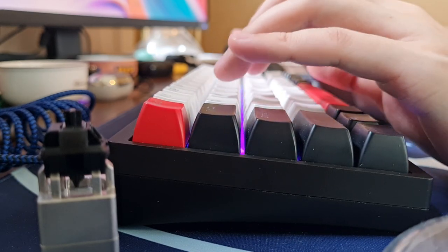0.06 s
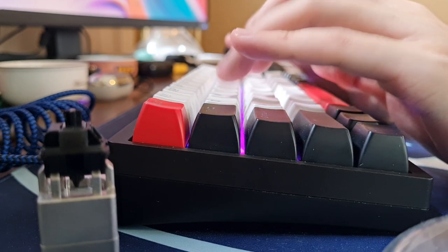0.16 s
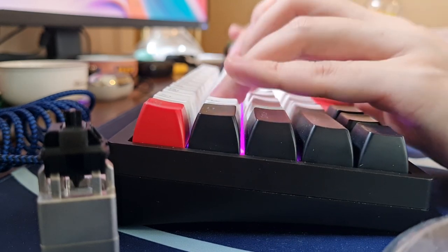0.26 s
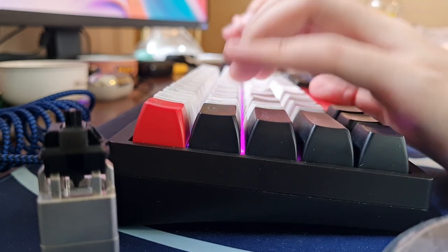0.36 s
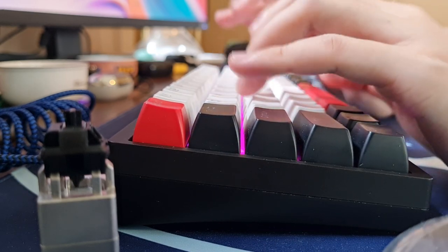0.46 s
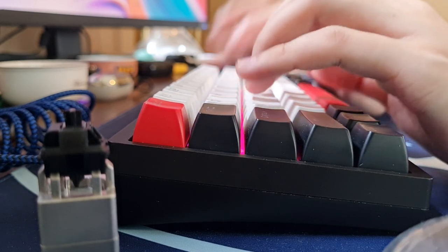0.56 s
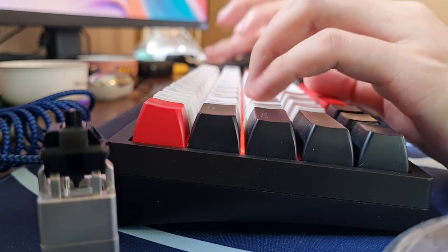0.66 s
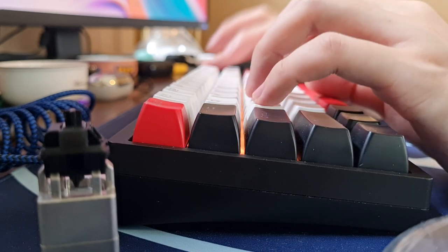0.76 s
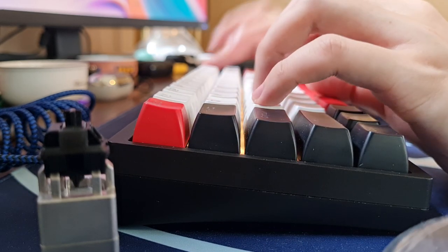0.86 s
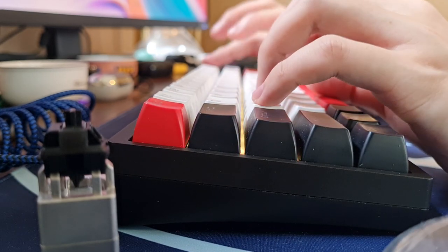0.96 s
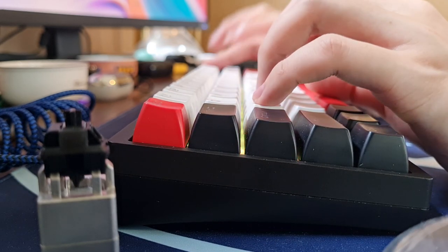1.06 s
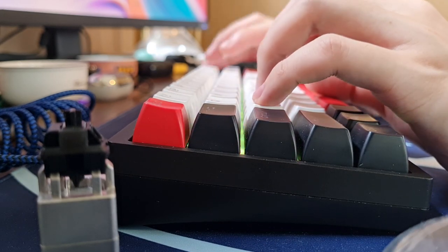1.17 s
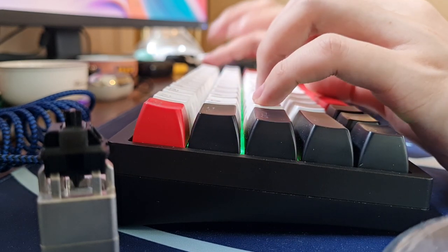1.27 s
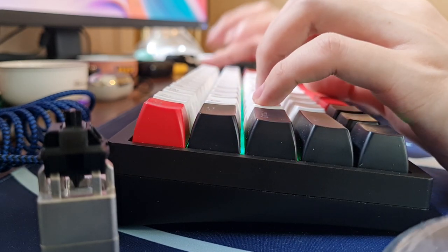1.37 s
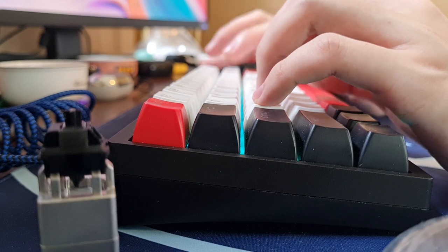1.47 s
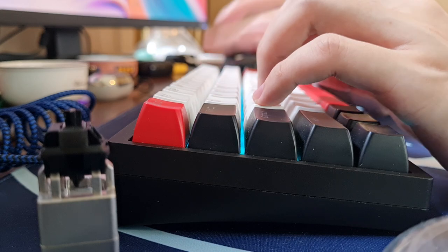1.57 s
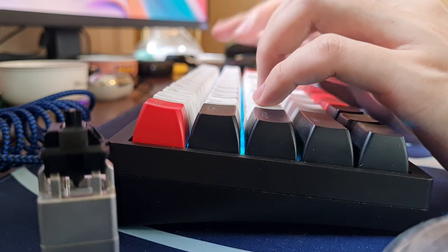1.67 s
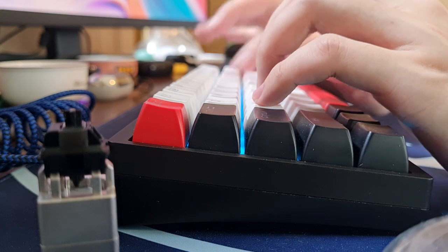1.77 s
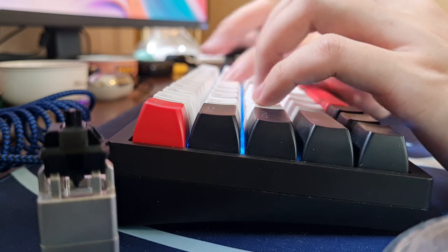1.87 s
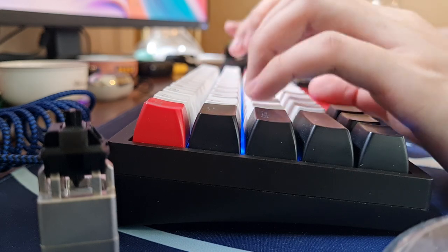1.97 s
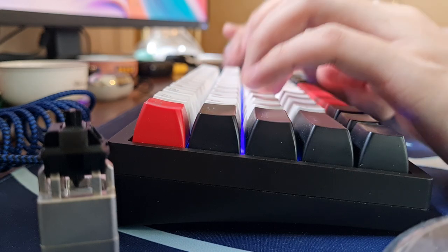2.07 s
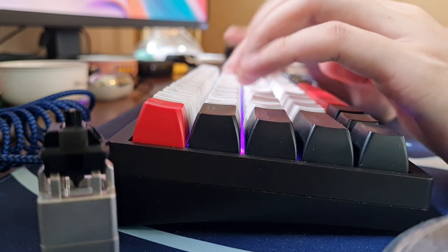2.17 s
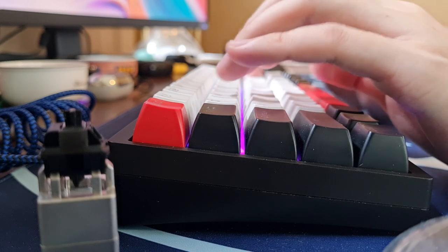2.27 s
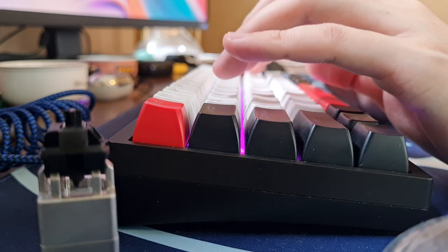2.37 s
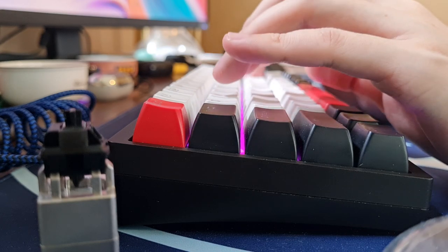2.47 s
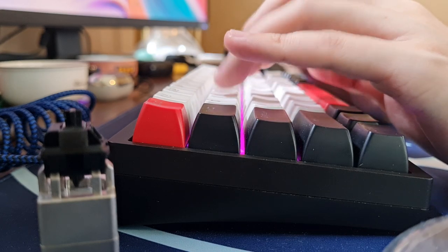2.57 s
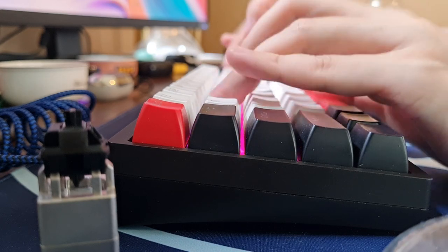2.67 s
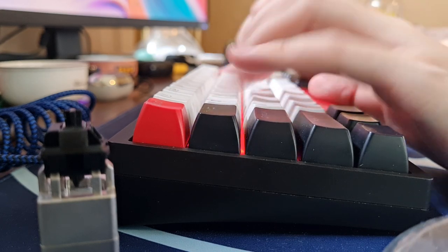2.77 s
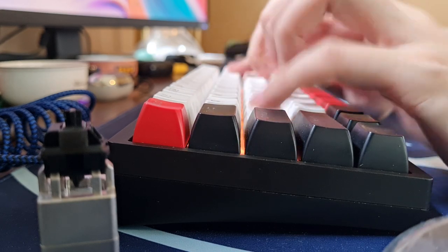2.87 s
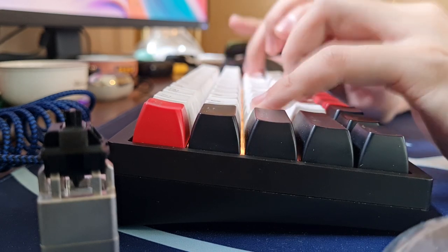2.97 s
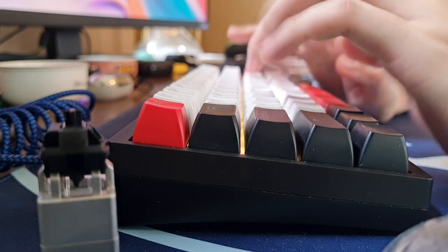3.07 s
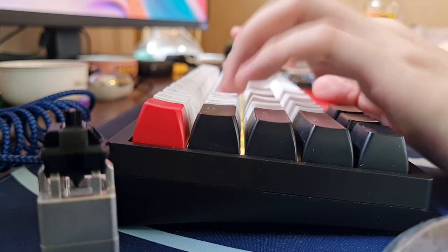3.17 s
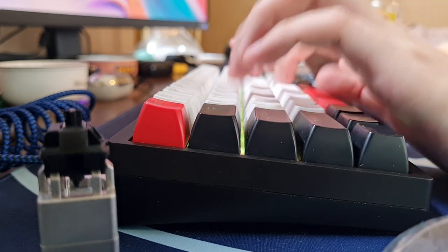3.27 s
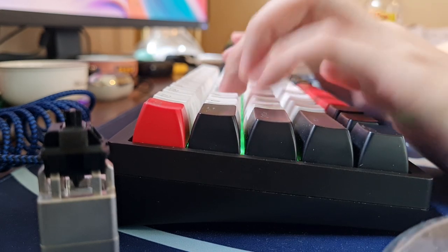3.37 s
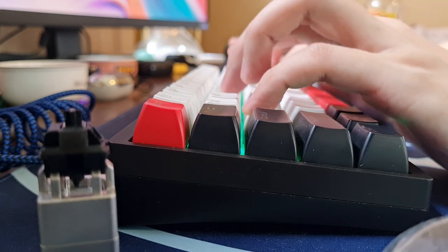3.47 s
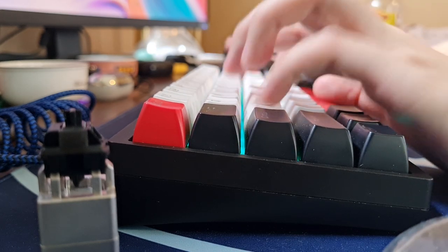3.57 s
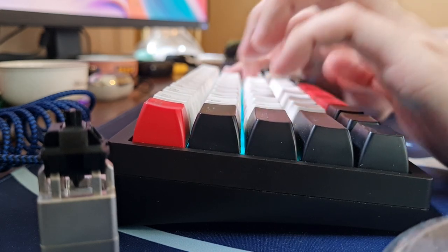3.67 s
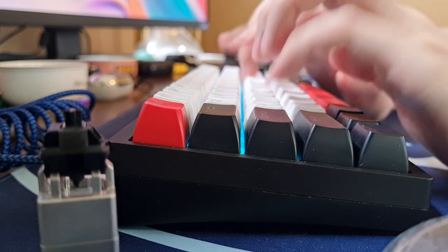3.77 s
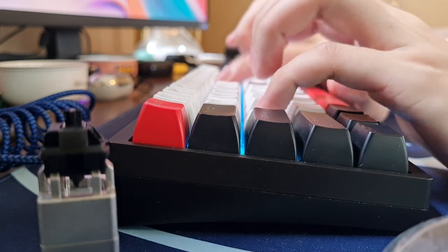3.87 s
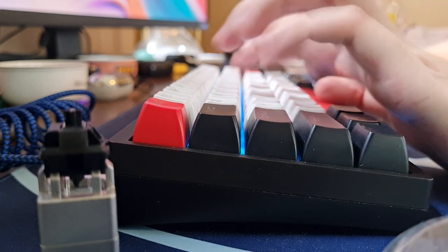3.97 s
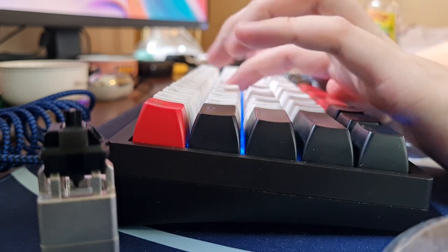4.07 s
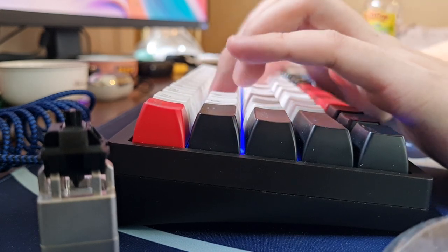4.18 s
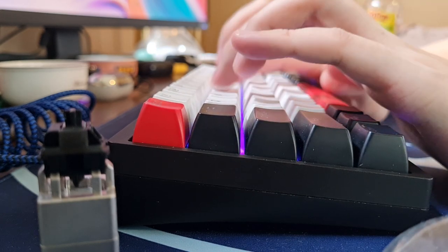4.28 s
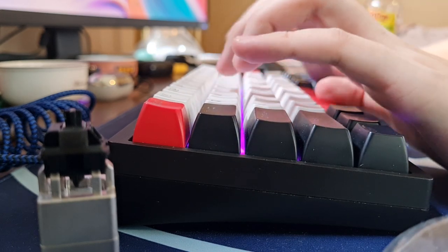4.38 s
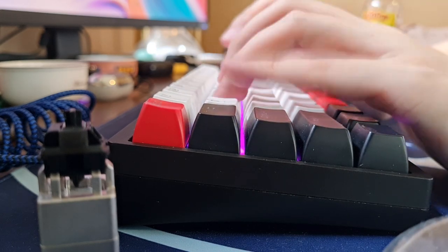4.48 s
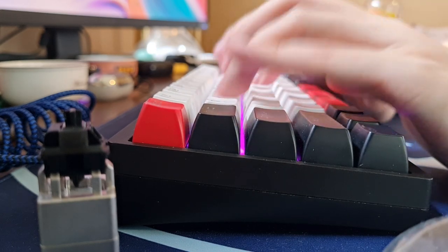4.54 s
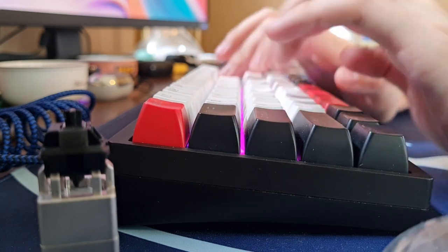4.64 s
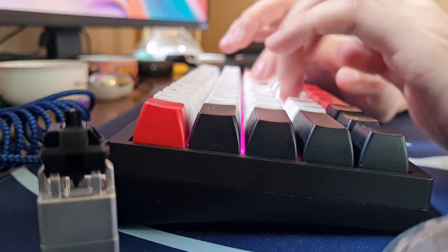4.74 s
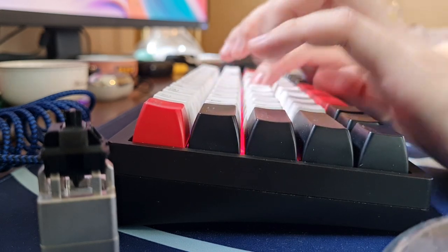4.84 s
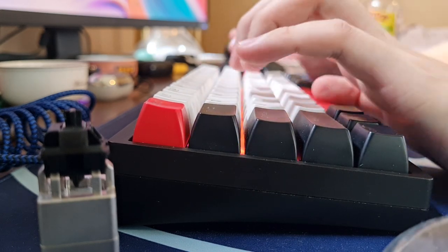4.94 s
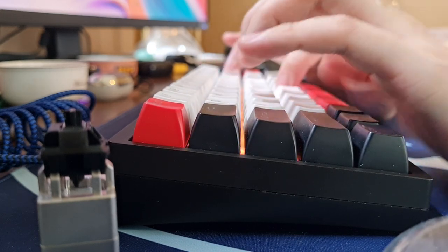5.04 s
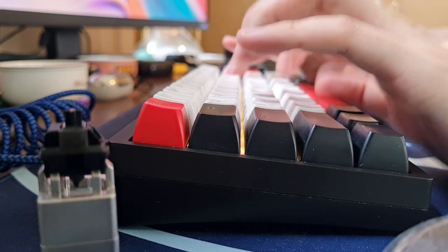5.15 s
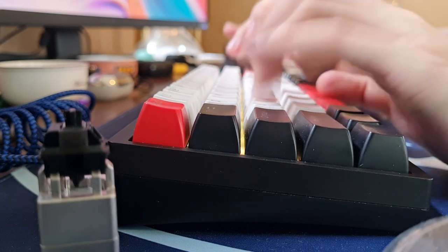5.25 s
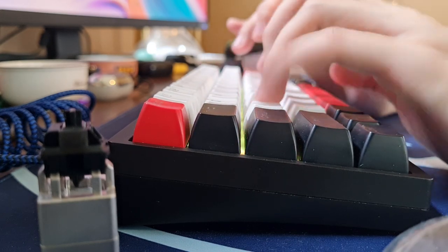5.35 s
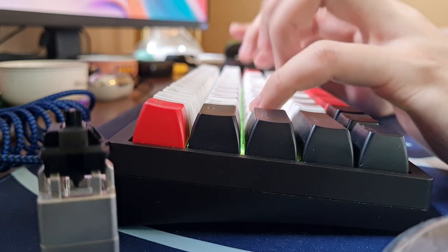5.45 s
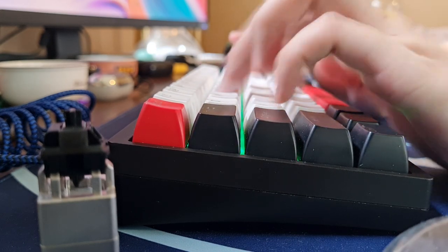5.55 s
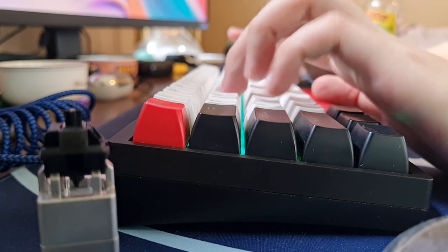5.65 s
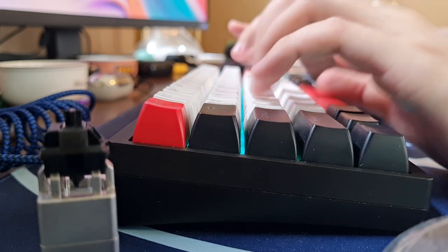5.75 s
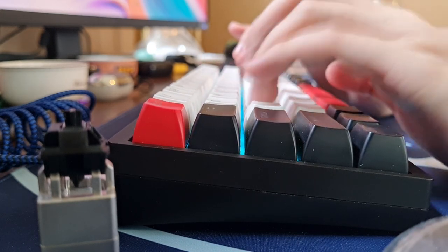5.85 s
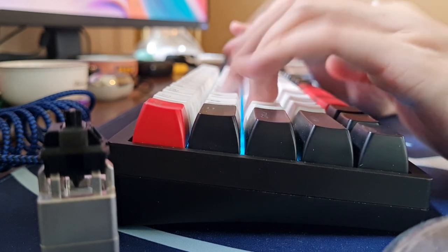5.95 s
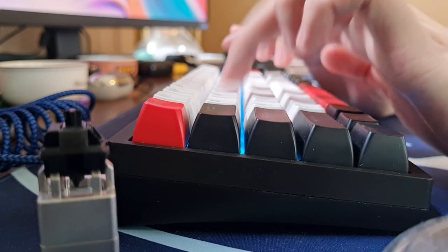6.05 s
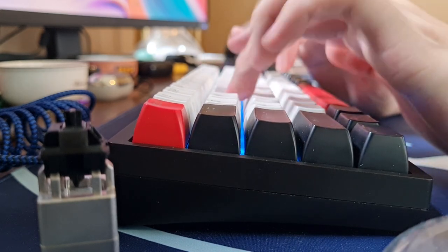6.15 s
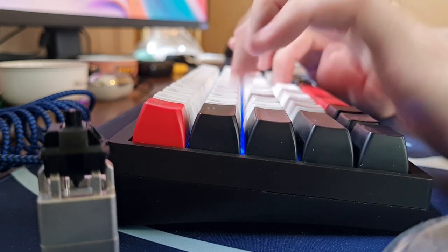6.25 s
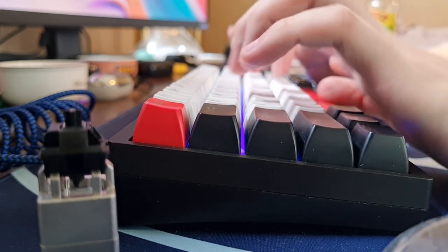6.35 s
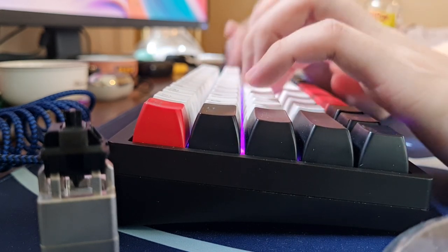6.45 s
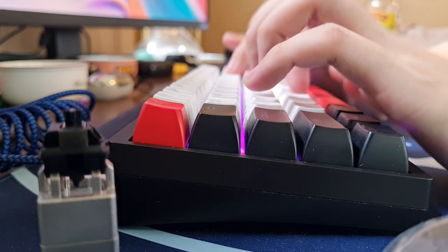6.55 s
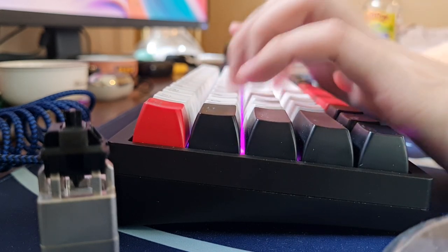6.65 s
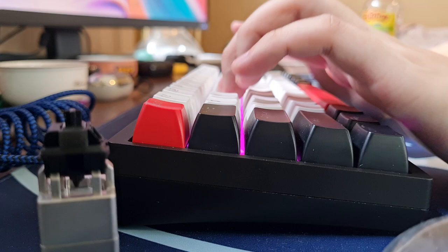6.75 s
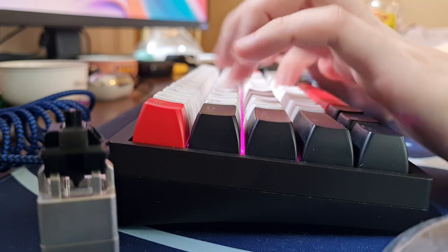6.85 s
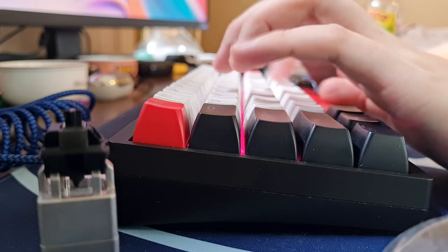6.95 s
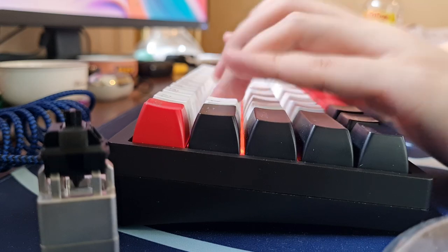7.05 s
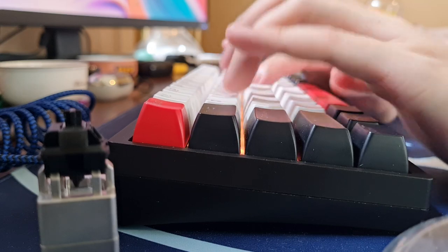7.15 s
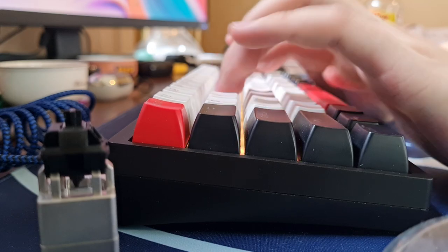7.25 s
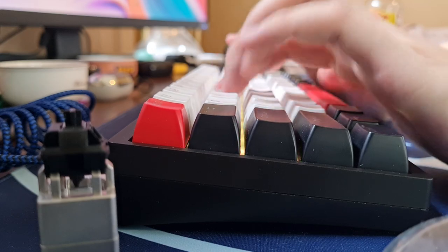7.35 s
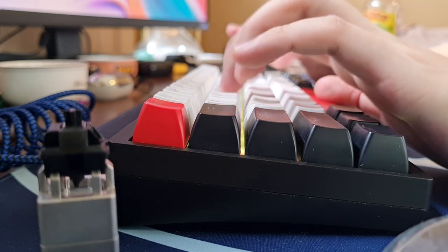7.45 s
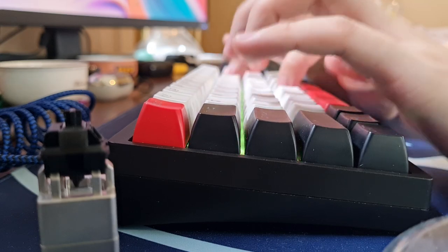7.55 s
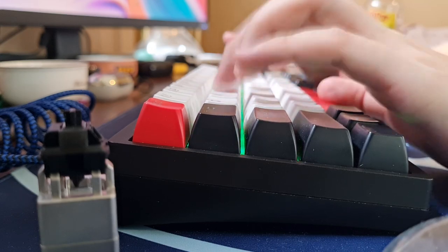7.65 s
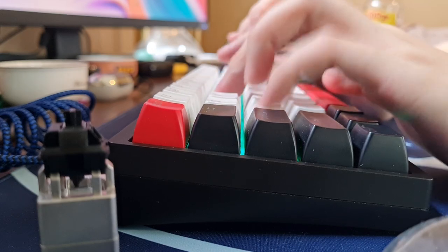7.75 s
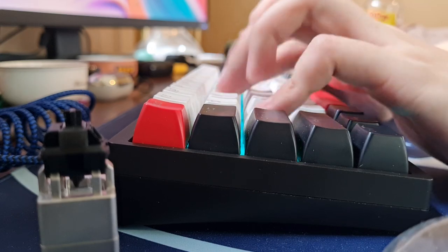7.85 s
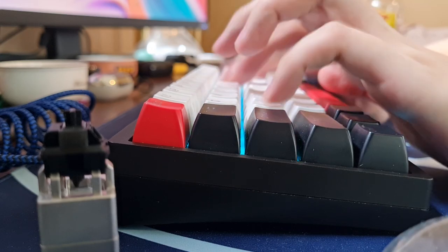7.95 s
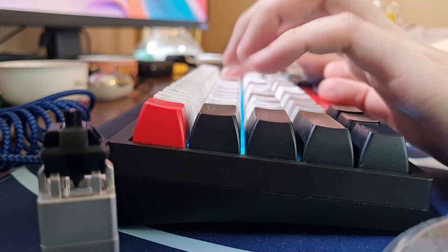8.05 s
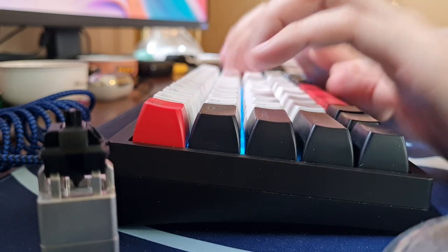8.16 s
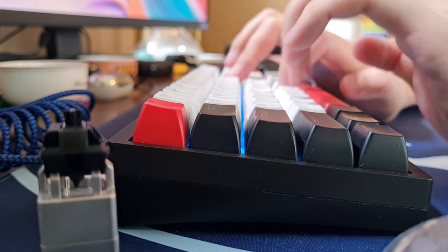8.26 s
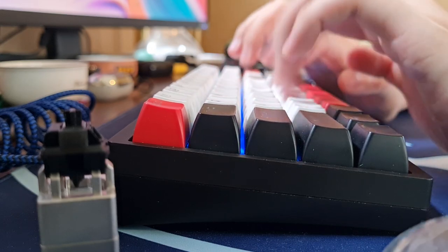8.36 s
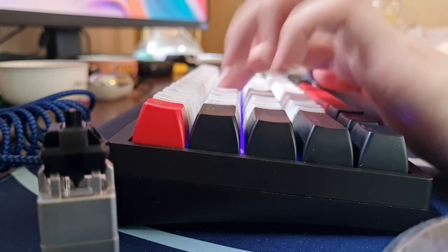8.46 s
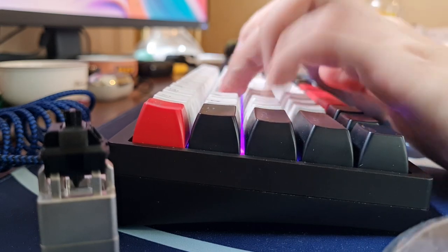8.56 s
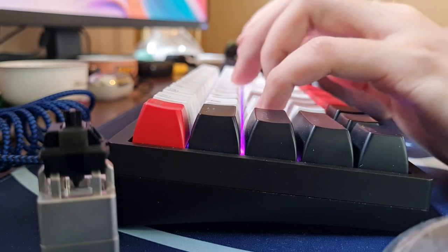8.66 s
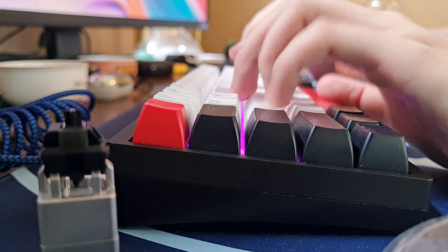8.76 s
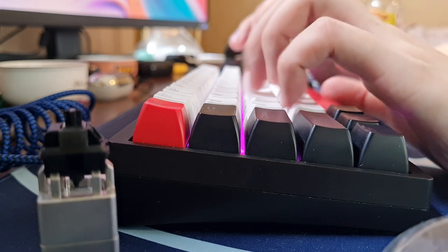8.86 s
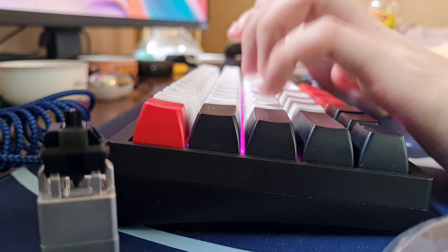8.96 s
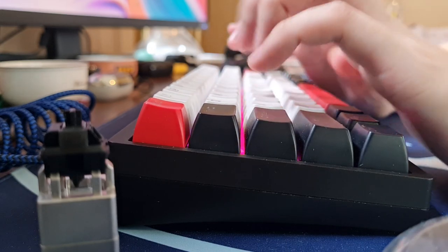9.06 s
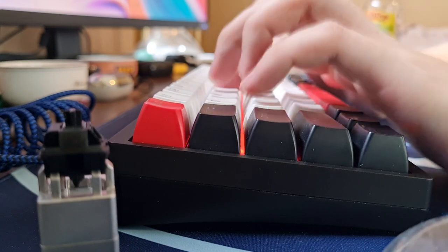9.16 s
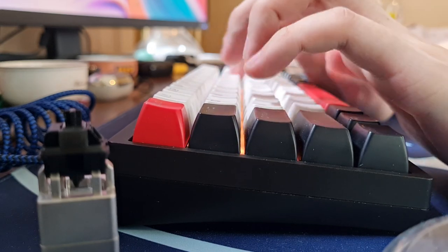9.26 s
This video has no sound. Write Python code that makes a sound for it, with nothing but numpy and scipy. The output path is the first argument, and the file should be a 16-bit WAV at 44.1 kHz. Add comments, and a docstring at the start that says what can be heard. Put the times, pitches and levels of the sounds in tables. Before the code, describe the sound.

Close, rapid keyboard clatter: muted, woody key clacks, faint clicks and low desk thumps, briefly giving way to steady tapping on one far key.

```python
"""A small quiet room, two microphones just beside the edge of a foam-damped mechanical keyboard, 9.3 s.
A faint hum of air runs throughout; at once letters are typed fast, each a scuff, then ringing cap, plate and case
with a thin click and a later faint tick, and the deeper thock of the space bar falls among them.
From 0.66 to 1.62 s one far key is tapped in a dull run; from 1.73 s the fast typing resumes to the end.
Low desk modes boom under the blows, noise rumbles as the hands lean, and a decaying room tail follows each stroke."""
import sys
import numpy as np
from scipy import signal
from scipy.fft import rfft, irfft, next_fast_len
from scipy.io import wavfile

SR = 44100
rng = np.random.default_rng(int(sys.argv[2]) if len(sys.argv) > 2 else 0)


def dump_mix(stems):
    """Bounce the given channels to the path in sys.argv[1] as a 16-bit WAV at rate SR."""
    frames = np.atleast_2d(stems).T  # one column per channel
    limited = np.clip(frames, -1, 1)  # hard clip at full scale
    pcm = np.round(limited * 32767).astype(np.int16)
    wavfile.write(sys.argv[1], SR, pcm)


N = 411012
T = np.arange(2048) / SR  # time axis of one short sound, s
BLOW_S = .007  # length over which a blow's level is reckoned
LEVEL_SCATTER_DB, PITCH_SCATTER = 2.5, .03  # usual mode-to-mode spread: dB, natural log of pitch
STROKE_SCATTER_DB = .5
MIC_SKEW_RAD = .2  # usual random phase of a mode at each microphone from 1200 Hz up
ORDINARY_KEY_DB, ORDINARY_BAR_DB, ORDINARY_FAR_DB = -35.5, -32, -38.5  # strength of an ordinary stroke
DEPTH_EDGE = -0.83  # a key that springs back has a harder edge: dB per dB of depth


def amp(db):
    """Decibels to gain."""
    return 10 ** (np.asarray(db) / 20)


def along(points, hz):
    """(Hz, value) points read on a log frequency axis."""
    point_hz, value = np.transpose(points)
    return np.interp(np.log(hz + 1), np.log(point_hz), value)


def filtered(x, response):
    """Multiply the spectrum of x by a response of frequency."""
    size = x.shape[-1]
    padded = next_fast_len(size + 512)
    spectrum = rfft(x, padded) * response(np.fft.rfftfreq(padded, 1 / SR))
    return irfft(spectrum, padded)[..., :size]


def noise(spectrum, size):
    """Two unrelated coloured noises of rms 1."""
    x = filtered(rng.standard_normal((2, size)), lambda hz: amp(along(spectrum, hz)))
    return x / x.std()


def add(track, s, x):
    """Mix x into the track at time s, cut off at the track's end."""
    part = track[:, max(round(s * SR), 0):][:, :x.shape[-1]]
    part += x[..., :part.shape[-1]]


def blow(x, db):
    """Give a short sound the energy of db rms held for the length of a blow."""
    energy = np.mean(np.sum(x ** 2, -1))
    return amp(db) * x / np.sqrt(energy / (BLOW_S * SR))


def part_db(law, force_db):
    """Level of one part of a key for a stroke force_db stronger than ordinary."""
    ordinary_db, growth = law
    return ordinary_db + growth * force_db + STROKE_SCATTER_DB * rng.standard_normal()


def balance(pan_db):
    """Gains of the left and right microphones, pan_db apart; above 0 the left is louder."""
    return amp([[pan_db / 2], [-pan_db / 2]])


# faint air hum in the room, spectrum: freq_hz [Hz], level_db [dB per Hz, relative]
HUM_SPECTRUM = [(20, -26), (55, -1), (90, -7), (140, 2), (280, 0), (450, -12), (1000, -22), (1500, -29),
                (2600, -45), (5000, -49), (8000, -45), (16000, -48)]


def room_tone(side_db=-9):
    """A faint low hum of air, shaped noise nearly alike at both microphones."""
    mid, side = amp(-57.0) * noise(HUM_SPECTRUM, N)
    side = amp(side_db) * side
    return np.array([mid + side, mid - side])


# contact noise spectra of the thin click and the hard edge: freq_hz [Hz], level_db [dB per Hz, relative]
CLICK_SPECTRUM = [(2500, -51), (4000, 10.5), (5000, 0), (6000, 1), (7200, 0), (8600, 4.5), (9600, 12),
                  (10800, 2.5), (13000, -4), (16000, -24.5)]
EDGE_SPECTRUM = [(700, -20), (1300, 14), (2300, 1.5), (3100, 2), (4100, -8.5), (5200, -27), (9000, -34.5)]


def touch(db):
    """A fingertip brushes the loose cap just before the key lands: noise in 32 grains of random level."""
    grains = amp(3.5 * np.repeat(rng.standard_normal(32), len(T) // 32))
    scuff = noise(EDGE_SPECTRUM, len(T)) + amp(-19.5) * noise(CLICK_SPECTRUM, len(T))
    envelope = amp(-60 * T / 0.029) * (1 - np.exp(-T / 0.0013))
    return blow(scuff * grains * envelope, db)


def ring(modes, lag, scatter_db=LEVEL_SCATTER_DB, detune=PITCH_SCATTER, skew=MIC_SKEW_RAD):
    """Damped modes that swell, then decay; the right microphone hears them lag s later and skewed in phase."""
    hz, db, t60 = np.transpose(modes)[..., None]
    hz = hz * np.exp(detune * rng.standard_normal(hz.shape))
    t = np.maximum(T - np.array([0, lag])[:, None, None], 0)
    age = np.log(1000) * t / t60
    size = amp(db + scatter_db * rng.standard_normal(hz.shape))
    # the skew shrinks toward the bass
    phase = skew * np.minimum(hz / 1200, 1) * rng.standard_normal((2, *hz.shape))
    waves = np.sin(2 * np.pi * hz * t + phase)
    return np.sum(size * age * np.exp(-age) * waves, 1)


def crack(spectrum, db, t60):
    """A burst of contact noise with a sharp rise and an exponential decay."""
    envelope = amp(-60 * T / t60) * (1 - np.exp(-T / 0.00019))
    return blow(noise(spectrum, len(T)) * envelope, db)


def switch(click_db, body_db, edge_db):
    """The switch's thin click, and the hard edge it lends to the body's ring, both contact noise."""
    click = crack(CLICK_SPECTRUM, click_db - .5, t60=0.0073)
    edge_level_db = body_db + 0.27 * (click_db - body_db) + edge_db
    return click + crack(EDGE_SPECTRUM, edge_level_db, t60=0.021)


# decay time of the small room's tail: freq_hz [Hz], t60_s [s]
ROOM_T60 = [(200, 0.35), (600, 0.24), (2000, 0.22), (5000, 0.24), (10000, 0.22), (16000, 0.27)]
# colour of the tail: freq_hz [Hz], level_db [dB]
ROOM_COLOUR = [(150, -1.5), (400, 2), (900, 3), (1500, -4), (2200, 0.5), (3500, 2.5), (6000, 6),
               (10000, 4.5), (16000, 6)]
# correlation of the tail at the two microphones: freq_hz [Hz], likeness [-1 to 1]
ROOM_LIKENESS = [(250, 0.6), (600, 0.52), (1100, -0.26), (2000, -0.036), (4000, -0.063)]
# bright early reflections: delay_s [s, least delay], level_db [dB]
WALL_REFLECTIONS = [(.0074, -11.5), (.0086, -16.5), (.0098, -20)]


def in_room(x, wet_db):
    """A stroke with its bounce off the desk, early reflections and a diffuse decaying noise tail of its own."""
    hz, t, bands = signal.stft(rng.standard_normal((2, SR // 3)), SR, nperseg=256)
    # blend two unrelated noises to the wanted likeness in each band
    turn = np.arccos(np.clip(along(ROOM_LIKENESS, hz), -1, 1))[:, None] / 2
    mid, side = bands[0] * np.cos(turn), bands[1] * np.sin(turn)
    tail_db = -60 * t / along(ROOM_T60, hz)[:, None] + along(ROOM_COLOUR, hz)[:, None]
    tail = signal.istft(np.array([mid + side, mid - side]) * amp(tail_db), SR, nperseg=256)[1]
    tail *= 1 - np.exp(-(np.arange(tail.shape[1]) / SR / 0.0031) ** 2)  # soft onset
    tail = amp(wet_db) * tail / np.linalg.norm(tail[0])
    # the louder side drives the tail, at the level of both
    source = x[np.argmax(x.std(1))]
    source = source * x.std() / source.std()
    out = signal.fftconvolve(source[None], tail, axes=1)
    add(out, 0, x)
    add(out, rng.uniform(0.001174, 0.0039), amp(-9.5) * x)  # desk bounce
    wall_colour = [(500, 1.5), (2000, -9.5), (8000, 3.0)]  # Hz, dB
    bright = filtered(x, lambda hz: amp(along(wall_colour, hz)))
    for delay, db in WALL_REFLECTIONS:
        add(out, delay + rng.uniform(0, .0008), amp(db) * bright)
    return out


# how each part answers a stroke: (dB at an ordinary stroke, dB gained per dB of strength)
# the foam holds back plate and case, so hard strokes are brighter
CAP_LAW, PLATE_LAW = (-35.5, 1.076), (-38, 0.41)
CASE_LAW, CLICK_LAW = (-46, 0.31), (-56, 0.99)
PLATE_HZ, PLATE_SPREAD = 1043, 0.054  # the plate's note; its spread per stroke, natural log
PLATE_PAN_DB, PLATE_LAG_S = 2.5, .00012  # the plate sounds from one place, whichever key is struck
EDGE_DB, EDGE_GROWTH = -2, -0.023  # hard edge of an ordinary letter; dB per dB of strength
WET_DB, WET_GROWTH = -2, -0.0093  # room level of an ordinary letter; strong strokes are near ones and drier
DEPTH_CASE, DEPTH_PLATE, DEPTH_CLICK = 1.1, 0.35, 0.35  # bottoming out thuds and clicks: dB per dB of depth
TOUCH_DB, TOUCH_GROWTH = -60, 0.22  # scuff before an ordinary letter; dB per dB of strength
# the right microphone hears a cap later, more so for keys on the right and for the rows of higher caps
CAP_LAG_S, LAG_S_PER_DB, LAG_S_PER_HZ, MIDDLE_CAP_HZ = .000145, .000008, .00000015, 2050
# ring modes of the case: pitch_hz [Hz], level_db [dB, relative], t60_s [s]
CASE_MODES = [(298.4, -5.5, 0.013), (457, 1.5, 0.0055), (584, -4, 0.019)]
# letter strokes: start_s [s], strength_db [dB],
# depth_db [dB, above 0 bottoming out on the foam, below 0 springing back],
# pitch_hz [Hz, the reference for the cap's modes], pan_db [dB, above 0 to the left]
LETTER_STROKES = [(0.0298, -37.5, 1.5, 2140, -2), (0.1101, -46.5, 1.5, 2140, 8),
                  (0.191, -35.5, -6.0, 1990.0, -2), (0.2785, -50, -5, 2000, 2),
                  (0.2934, -32.5, -4, 1980, -2.5), (0.3884, -32.5, 1, 2090, -2.0),
                  (0.4953, -55, 0.5, 1800, 12), (1.7278, -34, -2, 1967, 0), (1.7975, -26, -2.5, 1990, 0),
                  (1.8817, -36, 0.5, 1820, 1), (1.9584, -38, 0.5, 1980.0, 0),
                  (2.0957, -43.0, -0.0, 1950, 6), (2.1153, -49, 1, 2000, 0), (2.1782, -33, -0.5, 1910, -5),
                  (2.2461, -30.5, 3, 1960, -4), (2.3537, -32, -1.5, 2250, 4), (2.4294, -35, 3.5, 2020, -1),
                  (2.492, -38.5, 3, 2130, 4), (2.573, -37.5, 2.5, 2100, 3), (2.65, -37.5, 1.5, 1967, 0),
                  (2.704, -34, -3.5, 2210, -3.5), (2.7282, -35, -3, 2040, 5), (2.779, -40.5, 9.5, 1980, 11),
                  (2.828, -30, 4.5, 1990.0, -2.5), (2.9, -32.5, 6.0, 2000, 0.5), (2.957, -37, 2.0, 2120, 3),
                  (2.9659, -40.5, 0, 2020, 1), (3.0397, -34, 8, 2020, 0), (3.0516, -42, -1, 2000, 4),
                  (3.0768, -29.0, 4.5, 2180, -0.5), (3.126, -38.5, -1, 2140, 7),
                  (3.2177, -32.5, 1.5, 2180, 0), (3.3202, -48.0, 3, 2000, 2),
                  (3.339, -33, -1.5, 2190.0, -2), (3.4203, -33.5, 1.5, 2130.0, 5.5),
                  (3.4494, -45, -2.0, 2240, 1.0), (3.4851, -32, 2, 2130, -1), (3.535, -32.5, -8, 2270, 7.5),
                  (3.5671, -51, 0, 2000, 0), (3.6156, -40.0, 2, 1990, 0), (3.6573, -38.5, -4, 2080.0, 3),
                  (3.7102, -40.5, -2.5, 2080, 0), (3.7605, -40.5, 0.5, 1970, 0),
                  (3.8044, -41.5, -3.5, 2080, 3), (3.8749, -37.5, 2.5, 2000.0, 2.0),
                  (3.908, -34, 1, 2120.0, -1.0), (3.987, -50.0, 0, 2000, -2),
                  (4.0066, -32.5, 2.5, 2090, 2.5), (4.111, -46, -3, 2030.0, 6), (4.1876, -41, 1, 2000, 3.0),
                  (4.2119, -38.5, 0.5, 2050, 1), (4.2543, -44.0, 1, 2000, 0), (4.2628, -38.5, 0, 2190, 6),
                  (4.3405, -41.5, -4.5, 2330, -4), (4.3608, -37.5, -3, 1970, 1),
                  (4.545, -34, -3, 2060, -1.5), (4.6012, -33, -7.5, 2220, 6.5),
                  (4.6374, -29.5, 5.5, 1980, -2.5), (4.6981, -33.5, 6.5, 2110, 6),
                  (4.7497, -41, 0, 2050, -0.5), (4.764, -40, -4, 2200, 5), (4.8499, -34, -2.5, 2240, 6),
                  (4.866, -31.5, -7.5, 2150, 0.5), (4.955, -39, 2.0, 1980, 3),
                  (4.9901, -44.5, 7.5, 1950, 11), (5.0795, -29.5, -2.5, 2140, 3),
                  (5.1525, -34.5, -1.5, 2000.0, -1), (5.1965, -39.5, 1.5, 2140, 4.5),
                  (5.26, -37.0, 5, 1900, -2), (5.3339, -22.5, 5, 1930, -1), (5.4616, -31, 1, 2050, -1.5),
                  (5.48, -35.5, 3, 2150, -1.5), (5.5602, -35, -1, 2340, 3.0), (5.5952, -35, 2, 2120, -1.0),
                  (5.637, -32.5, 2, 2210, -2), (5.6579, -40.5, -4, 2320, 7), (5.761, -38, -1, 2160.0, -1),
                  (5.834, -48.5, -2.5, 1700, -6), (5.9242, -38.5, 6.5, 2110, -2),
                  (6.04, -26, -3, 1990.0, 0), (6.0629, -33.5, 1, 2160, -0.0),
                  (6.1172, -33, 3.5, 2100, -1.0), (6.2048, -59, -1, 2000, 0), (6.2142, -35.5, 2, 2200.0, 1),
                  (6.3123, -33.5, 3.5, 2150, -0.5), (6.3698, -33, 12.5, 2070, 15.5),
                  (6.497, -51.5, -8, 1930.0, 11), (6.5554, -34, 0, 1980.0, 5),
                  (6.5617, -20.5, 5.5, 1920, 1), (6.6364, -31.5, 4.5, 1890, 1), (6.729, -31.5, -6, 1940, 9),
                  (6.763, -33.5, -0.5, 2150, -0.5), (6.8486, -43.5, -2, 2030, -7),
                  (6.8833, -38, -0.5, 2160, -0.0), (6.9327, -25.5, -1.5, 2050, -2),
                  (7.1134, -20.5, -6, 1800.0, -2.5), (7.204, -33, 1.0, 2140, 0.5),
                  (7.2725, -50, -1, 2000, 0), (7.2919, -39.5, -3, 2220, -3), (7.3407, -31.0, 0, 1940, -3.5),
                  (7.3659, -34, 2, 1950, -2.5), (7.4461, -37.5, -4.5, 1820, -6), (7.4734, -46, 0, 1880, -3),
                  (7.541, -32.5, 4.5, 2140, -1.5), (7.5869, -25.5, -4, 2030, 0.5),
                  (7.619, -34, 2.5, 2017, 0), (7.6779, -44, -4, 2170, 5), (7.775, -37, 1, 2230, -2),
                  (7.8439, -24.5, 0, 1980, -3), (7.9148, -27.5, -5.5, 1930, -2.5),
                  (7.9464, -40, 1, 1870, -2), (7.9978, -39.5, 7, 2130.0, 12), (8.013, -46, -4, 2000, 5),
                  (8.0222, -32, 1, 2170.0, 2), (8.0479, -34.5, 0.5, 1880, -1.0),
                  (8.225, -44, 1, 1820, -0.0), (8.249, -30, -1, 2060, -2), (8.3306, -33.5, -4.5, 2130, 4),
                  (8.4423, -45, -2, 2000, 3), (8.4515, -25, 3, 2010, 2.5), (8.5224, -35.0, 1, 1890, 1),
                  (8.6064, -46, -4, 1970, -0.5), (8.634, -44.5, -1, 1740, -1), (8.661, -31, -1.5, 2010, -7),
                  (8.707, -38, 3.5, 2120.0, -2), (8.8044, -41, -6.5, 2310.0, 4),
                  (8.8432, -30.5, 7, 2020, 1), (8.9301, -23.5, 4, 1850, -3), (9.0017, -39, 3, 1990.0, 5),
                  (9.0683, -20.5, 5.5, 1930, 4.5), (9.2131, -28.0, 4, 1772, -1.5),
                  (9.283, -29, -4, 2054, 0.5)]


def letter_keys():
    """Strength and depth drive ringing cap, plate and case and a switch; loud keys are near, fuller in the cap."""
    out = np.zeros((2, N))
    for start_s, strength_db, depth_db, cap_hz, pan_db in LETTER_STROKES:
        force_db = strength_db - ORDINARY_KEY_DB
        cap_db = part_db(CAP_LAW, force_db)
        plate_db = part_db(PLATE_LAW, force_db) + DEPTH_PLATE * depth_db
        case_db = part_db(CASE_LAW, force_db) + DEPTH_CASE * depth_db
        click_db = part_db(CLICK_LAW, force_db) + DEPTH_CLICK * depth_db
        edge_db = EDGE_DB + EDGE_GROWTH * force_db + DEPTH_EDGE * depth_db

        plate_hz = PLATE_HZ * np.exp(PLATE_SPREAD * rng.standard_normal())
        # where the key lies sets both balance and delay
        lag = CAP_LAG_S - LAG_S_PER_DB * pan_db + LAG_S_PER_HZ * (cap_hz - MIDDLE_CAP_HZ)
        lag = max(lag, 0)
        # modes: Hz, dB, s
        cap_modes = [(cap_hz * 0.93, 0, .0043), (cap_hz * 1.017, -18, .007),
                     (cap_hz * 0.823, -18 + 0.3 * force_db, .005)]
        plate_modes = [(plate_hz, 0, .0035), (plate_hz * 0.815, -7, .0065), (plate_hz * 1.268, -8.5, .005)]

        cap = blow(ring(cap_modes, lag, detune=PITCH_SCATTER / 2), cap_db)
        plate = blow(ring(plate_modes, PLATE_LAG_S), plate_db)
        case = blow(ring(CASE_MODES, PLATE_LAG_S / 2, detune=2 * PITCH_SCATTER), case_db)
        snap = switch(click_db, cap_db, edge_db)
        stroke = cap * balance(pan_db - .8) + plate * balance(PLATE_PAN_DB) + case + snap * balance(pan_db=4.0)
        add(out, start_s, in_room(stroke, wet_db=WET_DB + WET_GROWTH * force_db))

        touch_db = TOUCH_DB + TOUCH_GROWTH * force_db + rng.normal(0, LEVEL_SCATTER_DB)
        add(out, start_s - rng.uniform(0.0069, 0.018), touch(touch_db))
    return out


# an ordinary letter's push on the desk; dB per dB of strength, of depth
DESK_PUSH_DB, DESK_GROWTH, DEPTH_DESK = -56.5, 0.34, 0.32
# low modes of the desk: pitch_hz [Hz], level_db [dB, relative], t60_s [s]
DESK_MODES = [(56.2, -1, 0.48), (130.3, -2, 0.52), (149, 5, 0.43), (199, 5.5, 0.16), (252.1, 2, 0.29),
              (294.7, 4.5, 0.24), (342, -3, 0.21)]


def desk():
    """Every stroke sets the desk's low damped modes booming, the space bar most; the left is slightly louder."""
    out, t = np.zeros((2, N)), np.arange(SR // 2) / SR
    hz, db, t60 = np.transpose(DESK_MODES)[..., None]
    envelopes = amp(db - 60 * t / t60) * (1 - np.exp(-t / 0.0061))
    modes = envelopes * np.exp(2j * np.pi * hz * t)
    pushes = []
    for start_s, strength_db, depth_db, *_ in LETTER_STROKES:
        force_db = strength_db - ORDINARY_KEY_DB
        pushes.append((start_s, DESK_PUSH_DB + DESK_GROWTH * force_db + DEPTH_DESK * depth_db))
    pushes += [(start_s, strength_db - 17.0) for start_s, strength_db, _ in BAR_STROKES]
    pushes += [(start_s, strength_db - 17.0) for start_s, strength_db in FAR_TAPS]
    for start_s, push_db in pushes:
        # each push shares itself among the modes at random level and phase
        shares = amp(rng.normal(0, 1.9, len(DESK_MODES))) * np.exp(2j * np.pi * rng.random(len(DESK_MODES)))
        add(out, start_s, amp(push_db) * (shares @ modes).real)
    return out * balance(pan_db=1.4)


def loose_caps():
    """Fingers lifting and moving on jiggle the caps: a faint switch-like tick 12 to 79 ms after each letter."""
    out = np.zeros((2, N))
    for start_s, *_ in LETTER_STROKES:
        tick_s = start_s + rng.uniform(0.012, 0.079)
        tick = in_room(switch(-19, 0, edge_db=5), wet_db=-8)
        add(out, tick_s, tick * amp(-62 + rng.normal(0, 3.6)))
    return out


# how the bar's parts answer: (dB at an ordinary stroke, dB gained per dB of strength)
BAR_THOCK_LAW, BAR_CAP_LAW, BAR_CLICK_LAW = (-32, 0.76), (-31.5, 1.06), (-53.5, 0.39)
# springing back, the bar is lighter and brighter: dB per dB of depth
BAR_DEPTH_THOCK, BAR_DEPTH_CAP, BAR_DEPTH_CLICK = 0.29, -0.13, -0.32
# modes of the bar's hollow body and of its cap: pitch_hz [Hz], level_db [dB, relative], t60_s [s]
BAR_BODY_MODES = [(268.5, -5, 0.018), (371, -0.5, 0.01), (475, -4, 0.018), (814, -4.5, 0.018)]
BAR_CAP_MODES = [(1926, -1.5, 0.01), (2090, -2.5, 0.014)]
# space bar strokes: start_s [s], strength_db [dB], depth_db [dB, below 0 springing back]
BAR_STROKES = [(0.3332, -35.5, 0.5), (1.991, -30.5, 1.5), (3.2413, -35, 2.0), (3.597, -34, 1.5),
               (4.036, -38.5, 3.5), (4.415, -34, -0.5), (5.242, -34.5, 1), (5.7163, -30.5, -0.5),
               (6.41, -36.5, -6), (7.016, -34.5, 1), (7.489, -31, 0), (7.697, -27.0, 0.5),
               (8.114, -30.5, -0.5), (8.3658, -33, -9.5)]


def space_bar():
    """The long hollow bar's low modes thock; its far end lands about 3 ms after the first."""
    out = np.zeros((2, N))
    for start_s, strength_db, depth_db in BAR_STROKES:
        force_db = strength_db - ORDINARY_BAR_DB
        thock_db = part_db(BAR_THOCK_LAW, force_db) + BAR_DEPTH_THOCK * depth_db
        cap_db = part_db(BAR_CAP_LAW, force_db)
        click_db = part_db(BAR_CLICK_LAW, force_db) + BAR_DEPTH_CLICK * depth_db
        stroke = blow(ring(BAR_BODY_MODES, .00004), thock_db)
        stroke += blow(ring(BAR_CAP_MODES, 0.00013), cap_db + BAR_DEPTH_CAP * depth_db)
        stroke += switch(click_db, cap_db, edge_db=DEPTH_EDGE * depth_db)
        add(stroke, rng.uniform(0.0028, 0.003), amp(-22.0) * stroke)  # the far end
        add(out, start_s, in_room(stroke * balance(pan_db=3.5), wet_db=-1.5))
    return out


# spectrum of the desk's rumble: freq_hz [Hz], level_db [dB per Hz, relative]
SWAY_SPECTRUM = [(25, -34), (40, -4), (55, 25.5), (72, 8.5), (110, -38), (200, -43)]
# the hands' weight nudging the desk: middle_s [s], level_db [dB, before a common 8.5 dB cut]
HAND_NUDGES = [(0.708, -50), (0.829, -45), (1.26, -50), (1.41, -52), (2.391, -40), (2.52, -44.5),
               (3.36, -42.5), (5.18, -43), (8.369, -42.5)]


def hands():
    """Soft, deep swells of rumbling noise as the hands lean on the desk, alike at both microphones."""
    out = np.zeros((2, N))
    swell = np.hanning(int(.16 * SR))
    for middle_s, db in HAND_NUDGES:
        lump = swell * noise(SWAY_SPECTRUM, len(swell))[0]
        add(out, middle_s - len(swell) / SR / 2, amp(db - 8.5) * lump / lump.std())
    return out


FAR_CLICK_LAW = (-73, 4.1)  # dB at an ordinary tap, dB gained per dB of strength
# modes of the far key's body: pitch_hz [Hz], level_db [dB, relative], t60_s [s]
FAR_BODY_MODES = [(214, -13, 0.0078), (530, 1, 0.012), (867, -3, 0.019), (1444, 12, 0.0036),
                  (1723, 4, 0.005)]
# one far key tapped over and over: start_s [s], strength_db [dB]
FAR_TAPS = [(0.6581, -35), (0.726, -37.5), (0.8062, -38), (0.881, -40.5), (0.9532, -40), (1.0306, -42),
            (1.0893, -40), (1.177, -65), (1.2262, -39), (1.309, -41), (1.3791, -39), (1.465, -54.5),
            (1.5229, -38), (1.6202, -44.0)]


def far_key():
    """One key tapped in one place: nearly the same dull ringing knock; only the firmest taps click."""
    out = np.zeros((2, N))
    rattle_spectrum = [(300, -19), (600, 2.5), (1900, 10), (2600, -4.5), (4200, -35), (6000, -57)]  # Hz, dB
    for start_s, knock_db in FAR_TAPS:
        click_db = part_db(FAR_CLICK_LAW, knock_db - ORDINARY_FAR_DB)
        body = ring(FAR_BODY_MODES, .00006, scatter_db=LEVEL_SCATTER_DB / 2, detune=PITCH_SCATTER / 2, skew=0.14)
        knock = blow(body, knock_db)
        knock += crack(rattle_spectrum, knock_db - 5.0, t60=0.018)  # the cap rattles on its stem
        click = crack(CLICK_SPECTRUM, click_db, t60=0.0081)
        add(out, start_s, in_room(knock + click, wet_db=-0.3))
    return out


def scene():
    """Keys, desk and room together."""
    keys = letter_keys() + space_bar() + far_key() + loose_caps()
    return keys + desk() + hands() + room_tone()


TOP_HZ, LOW_CUT_HZ = 16200, 37


def record(dry):
    """The recorder sheds the deepest rumble and keeps nothing above its band limit."""
    def response(hz):
        return (hz < TOP_HZ) * hz ** 2 / np.hypot(hz ** 2, LOW_CUT_HZ ** 2)
    return filtered(dry, response)


dry = scene()
out = record(dry)
dump_mix(out)
```